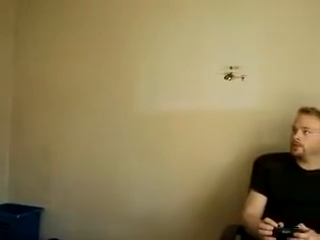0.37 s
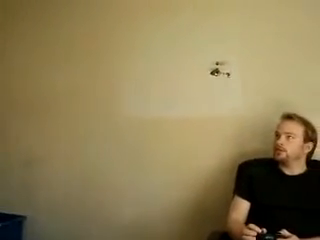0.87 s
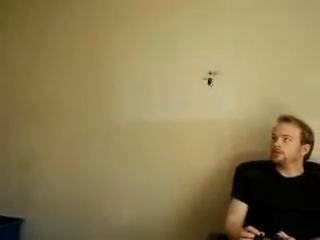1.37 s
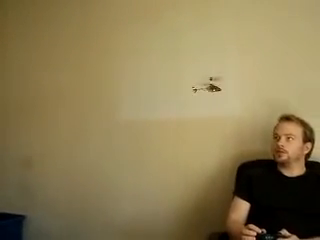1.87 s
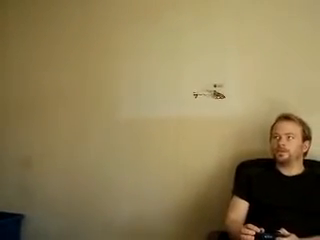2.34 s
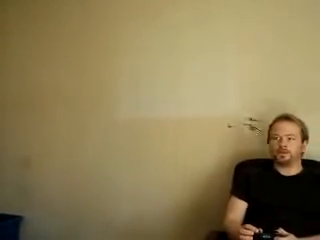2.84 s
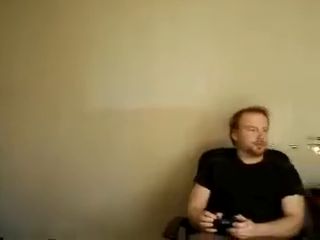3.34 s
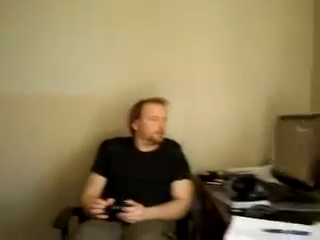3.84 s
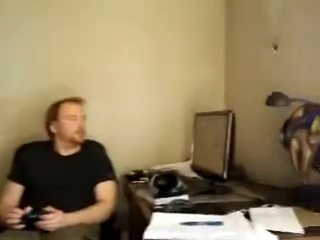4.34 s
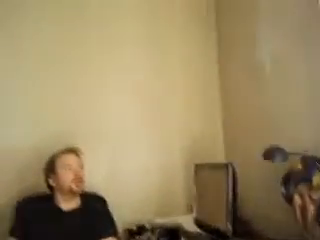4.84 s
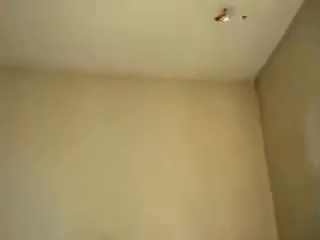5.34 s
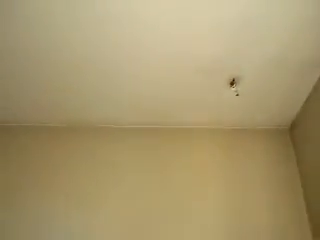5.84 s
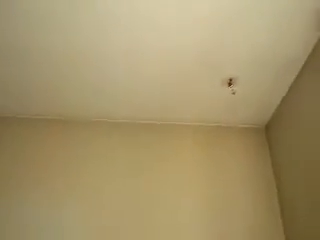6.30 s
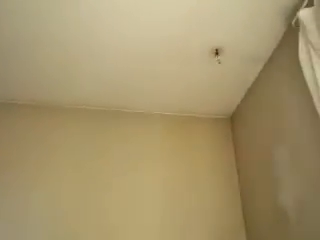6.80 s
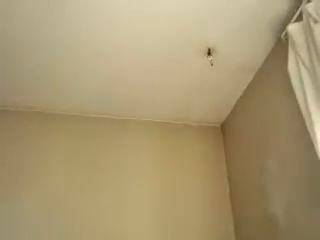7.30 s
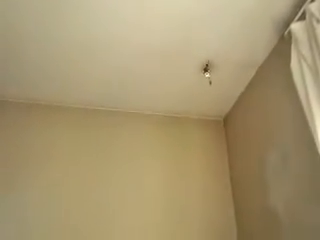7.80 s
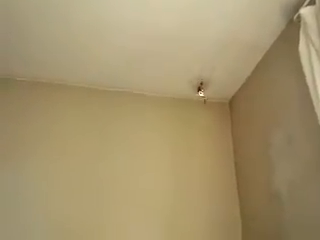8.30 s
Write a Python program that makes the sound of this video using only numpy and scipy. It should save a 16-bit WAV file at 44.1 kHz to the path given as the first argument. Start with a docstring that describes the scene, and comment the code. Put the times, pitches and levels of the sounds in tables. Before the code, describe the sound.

A little electric helicopter with two rotors flies without pause for about 8.4 seconds in a bare, lightly echoing room, picked up in mono by a small camera microphone. A loud, bright wash of gear clatter and blade hiss fills the treble, grainy and fluttering, its very top cut away. Inside it sit two close motor whines, around 3 kHz with higher and lower companions, rough and beating. They waver, dip slightly around 2.5 s, then climb to their highest near 4.3 s. They sink by 5.5 s, spread clearly apart around 5.8 s, draw together and droop to their lowest near 7.5 s, then rise again by 8 s. Short swells of whine come and go, strong near 2.8, 6.7 and 7.6 s. Faint blade hum and a wavering low house hum lie underneath. It ends still flying.

```python
"""A toy helicopter with two stacked rotors flies about a bare room before one small camera microphone.
From the start two motors whine through seven-tooth pinions and their pitches wander, rising until about 4.3 s.
They sink by 5.5 s, draw widely apart near 5.8 s, reach their lowest near 7.5 s and then recover.
Throughout, the crossing blades hum as rotating interference, and gear clatter and blade hiss, as shaped noise,
fill the treble; the house adds a wavering low hum, rumble, faint tones and a quiet noise floor."""
import sys
import numpy as np
from scipy import signal
from scipy.fft import rfft, irfft
from scipy.io import wavfile
from scipy.ndimage import uniform_filter1d, map_coordinates

SR = 44100
rng = np.random.default_rng(int(sys.argv[2]) if len(sys.argv) > 2 else 0)


def amplitude_ratio(level_db):
    """Convert a level in decibels to the matching linear amplitude (field) ratio."""
    exponent = np.asarray(level_db, float) / 20
    return 10 ** exponent


def wrap_up_sound(samples):
    """Save the sound to the file named by the first command line argument, as 16-bit audio."""
    columns = np.atleast_2d(samples).T
    # keep every value between -1 and 1, then stretch to whole-number steps
    tamed = np.clip(columns, -1, 1)
    steps = np.round(tamed * 32767).astype(np.int16)
    wavfile.write(sys.argv[1], SR, steps)


N = 371322
T = np.arange(N) / SR

# throttle moves both motors together, steering moves them apart:
# (time [s], first shaft rate [Hz], second shaft rate [Hz])
SHAFT_SPEEDS = [(0.0, 422.2, 460.6), (0.42, 424.5, 456.3), (0.98, 410, 447), (1.14, 415, 449),
                (1.34, 427.2, 449.6), (1.92, 420.5, 453.1), (2.22, 409.9, 439), (2.6, 407.6, 429.5),
                (3.0, 418.4, 454.8), (3.2, 421.6, 461.6), (3.58, 423.8, 465), (3.78, 432, 487.6),
                (4.0, 437.2, 498), (4.34, 445.1, 499.8), (4.68, 436.4, 490), (4.96, 442.7, 469.2),
                (5.42, 411.3, 436), (5.56, 406.3, 452), (5.78, 410.7, 487.8), (6.1, 422, 474.3),
                (6.72, 417.6, 457.6), (7.1, 393.4, 426.4), (7.48, 388.9, 413.8), (7.98, 417.6, 451.9),
                (8.42, 418.4, 462.5)]
# flight across the room: (time [s], relative level of clatter and hiss [dB],
# relative level of the second shaft's fundamental [dB])
FLIGHT_LEVELS = [(0.0, 0.5, 0.5), (2.0, 0, 3), (2.5, -1.5, -10), (2.9, 1, -11), (3.5, 1.5, -4),
                 (3.9, 1, -1.5), (5.0, 1, -2), (5.6, 1, -14.5), (6.15, 0.5, -3), (6.9, .5, -10.5),
                 (7.35, -1, -1), (7.8, 0.5, -7), (8.42, 1, -6)]
# tooth-mesh whine swelling as the craft drifts through the room's echoes:
# (centre time [s], length [s], peak level [dB])
MESH_SWELLS = [(0.64, .14, -57), (1.0, 0.19, -42), (1.42, .4, -41.5), (2.62, .14, -39), (2.85, 0.14, -36.5),
               (3.1, .2, -43), (3.42, .2, -43), (3.75, .2, -41.5), (4.15, .4, -41), (4.55, 0.36, -42),
               (4.95, .14, -41), (5.4, 0.15, -40), (5.65, .2, -41.5), (5.82, .12, -40.5),
               (6.11, 0.12, -40.5), (6.42, .3, -42.5), (6.69, .18, -36), (7.25, 0.46, -46.5),
               (7.64, 0.3, -36.5), (8.05, 0.15, -43.5)]
# weaker multiples of each shaft before the body colours them: (multiple of shaft rate [1], level [dB])
FIRST_SHAFT_ORDERS = [(5, -57), (6, -62.5), (8, -57.5), (9, -64), (11, -60), (12, -53), (14, -51),
                      (15, -56)]
SECOND_SHAFT_ORDERS = [(5, -60.5), (6, -66), (13, -53.5), (15, -58)]
# multiples of the second shaft that stand out for a while as the craft turns:
# (centre time [s], length [s], multiple of shaft rate [1], peak level [dB])
SECOND_SHAFT_SWELLS = [(0.0, 0.57, 8, -52.5), (2.7, 0.51, 8, -52), (4.15, .6, 8, -45), (5.83, 0.31, 8, -48),
                       (6.35, 0.21, 8, -49), (8.4, .3, 8, -56), (0.45, 2.6, 10, -50), (1.6, .7, 10, -51),
                       (5.05, .4, 10, -56), (5.82, 0.29, 10, -48.5), (6.55, .4, 10, -51.5),
                       (0.1, 0.55, 11, -54.5), (3.3, 0.68, 11, -50.5), (2.45, .4, 11, -52),
                       (6.1, .4, 11, -53), (6.52, 0.37, 11, -50), (8.28, .45, 11, -44),
                       (1.9, 0.36, 14, -57), (3.2, .6, 14, -58), (4.1, 0.56, 14, -50), (4.8, .5, 14, -51),
                       (3.1, .4, 7, -47), (4.2, 1.5, 7, -48.5), (5.95, 0.51, 14, -48), (6.6, 0.63, 14, -47),
                       (7.3, 0.67, 14, -51.5), (8.3, .5, 14, -50.5)]
# rotor gear runout, throb depth scaled by a random walk: (once a rotor turn [1], twice a rotor turn [1])
GEAR_RUNOUT = .3, .18
# swelling tones of the crossing blades:
# (centre time [s], length [s], multiple of crossing rate [1], peak level [dB])
CROSSING_SWELLS = [(1.0, 0.54, 1, -67.5), (3.95, 0.56, 1, -58), (4.85, 0.34, 1, -66.5),
                   (5.5, 0.58, 1, -56.5), (6.4, 1.3, 1, -62.5), (7.78, 0.31, 1, -58.5),
                   (8.15, .5, 1, -65.5), (0.9, 3.7, 2, -69.5), (2.9, 1.3, 2, -70), (4.0, 0.45, 2, -70.5),
                   (6.1, 0.75, 2, -69.5), (7.35, 0.87, 2, -69), (8.3, .5, 2, -67.5), (2.4, 1.6, 3, -74),
                   (4.2, 1.3, 3, -71.5), (5.65, 0.67, 3, -68.5), (7.9, 0.81, 3, -70)]
# plastic body and microphone resonance: (frequency [Hz], relative level [dB per Hz])
BODY_SPECTRUM = [(1500, -24.5), (2000, -20), (2250, -14.5), (2450, -0.5), (2900, 3), (3250, -3),
                 (3800, -5.5), (4500, -1), (5300, -6.5), (5900, -4), (6300, -5), (7900, -6)]
# swells of the low house hum, then of the rumble: (centre time [s], length [s], peak level [dB])
HUM_SWELLS = [(0.22, 0.079, -61), (1.04, 0.11, -60), (1.25, 0.16, -62), (1.56, 0.24, -57),
              (1.88, 0.24, -55), (2.5, .25, -56), (2.9, .45, -57), (3.8, .35, -56.5), (4.25, .14, -58),
              (4.52, .14, -57), (4.77, .14, -55), (5.09, .14, -56.5), (5.37, 0.1, -57.5),
              (5.98, 0.29, -55.5), (6.8, .25, -58), (7.32, 0.49, -55), (7.85, 0.31, -59), (8.35, .3, -59)]
RUMBLE_SWELLS = [(0.64, 0.41, -70), (3.7, 0.68, -62), (6.6, 0.27, -67), (8.3, 0.69, -68)]
# faint house tones: (frequency [Hz], level [dB])
HOUSE_TONES = [(75, -80), (95, -77.5), (222, -71.5), (392, -79)]
# spectrum of the quiet floor: (frequency [Hz], relative level [dB per Hz])
FLOOR_SPECTRUM = [(15, -33), (25, -1), (64, -1.5), (171, -12.5), (230, -4.5), (292, -7.5), (479, -11),
                  (1090, -14.5), (2000, -6), (2600, -45), (4400, -120)]
# steep top cut of the camera: (frequency [Hz], gain [dB])
CAMERA_RESPONSE = [(7960, -0.5), (8020, -10.5), (8200, -78)]

PINION_TEETH, BLADES = 7, 2  # teeth of each pinion, blades of each rotor
MESH_REST_DB, STRONG_REST_DB, CROSSING_REST_DB = -47.5, -62, -81  # levels between swells
HUM_REST_DB, RUMBLE_REST_DB = -70, -69.5  # levels between swells
SHAFT_DB, BAND_DB, TREBLE_DB = -66.5, -40.5, -34  # reference levels, moved by the flight
TREBLE_SLOPE = 1.03  # treble change per dB of clatter and hiss change
SPLIT_HZ = 4190  # between the two noise bands
HUM_HZ, FLOOR_DB = 51.6, -61.5  # mean hum frequency, reference level of the floor
ROOM_T60_S, ROOM_DB = 0.41, -7  # decay time, echoes against the direct sound


def helicopter():
    """Superposition: whines of motors and crossing blades add to gear clatter and blade hiss."""
    first_hz, second_hz = curves(SHAFT_SPEEDS)
    noise_db, shaft_db = curves(FLIGHT_LEVELS)
    first = running_turns(first_hz, 0.001183)
    second = running_turns(second_hz, 0.0012)
    echoed = room(pinion_mesh(first) + first_motor(first) + second_motor(second))
    fundamental = tone(second, SHAFT_DB + shaft_db, 3.2, rate=3.7)
    whine = echoed + fundamental + crossing_blades(first, second)
    return whine + clatter_and_hiss(first, second, noise_db)


def pinion_mesh(turns):
    """Gear meshing: each tooth contact excites the gear, a tone at teeth times shaft rate."""
    return tone(PINION_TEETH * turns, swells(MESH_SWELLS, MESH_REST_DB), 1.2, rate=14, flicker_db=3.0)


def first_motor(turns):
    """Harmonic series of the first shaft, amplitude-modulated by gear runout."""
    return shaft_orders(turns, FIRST_SHAFT_ORDERS, 7.7) * throb(turns)


def second_motor(turns):
    """Harmonic series of the second shaft with swelling strong multiples, modulated by gear runout."""
    gear = shaft_orders(turns, SECOND_SHAFT_ORDERS, 8.5)
    for multiple in (7, 8, 10, 11, 14):
        level_db = swells(chosen(SECOND_SHAFT_SWELLS, multiple), STRONG_REST_DB)
        gear += tone(multiple * turns, level_db, 2.9, rate=12, flicker_db=3.0)
    return gear * throb(turns)


def shaft_orders(turns, orders, fade_db):
    """Resonant filtering: weak shaft multiples, each fading on its own, coloured by the body."""
    tones = sum(tone(int(k) * turns, db, fade_db, rate=6, flicker_db=5.0) for k, db in orders)
    return colour(tones, BODY_SPECTRUM)


def throb(turns):
    """Amplitude modulation: a rotor gear out of true puts side lines round the shaft multiples."""
    angle = 2 * np.pi * turns / PINION_TEETH
    once = GEAR_RUNOUT[0] * np.sin(angle) * walk(6)
    twice = GEAR_RUNOUT[1] * np.sin(2 * angle) * walk(6)
    return unit(1 + once + twice)


def crossing_blades(first, second):
    """Rotor interaction: with opposed rotation, blades cross at the sum of both blade rates."""
    crossing = BLADES * (first + second) / PINION_TEETH
    hum = 0
    for multiple in (1, 2, 3, 4):
        level_db = swells(chosen(CROSSING_SWELLS, multiple), CROSSING_REST_DB)
        hum = hum + tone(multiple * crossing, level_db, 1.5, rate=6.6)
    return hum


def clatter_and_hiss(first, second, noise_db):
    """Broadband radiation: tooth noise and blade hiss, shaped by the body, with patchy narrow bands."""
    # the first pinion runs slightly off centre, so its clatter throbs once a shaft turn
    first_gear = clatter(first, 0.73) * (1 + 0.4 * np.sin(2 * np.pi * first))
    second_gear = amplitude_ratio(-0.5) * clatter(second, 0.81)
    hiss = amplitude_ratio(-2) * rng.standard_normal(N)
    rush = colour(first_gear + second_gear + hiss, BODY_SPECTRUM)
    rush = patchy_bands(rush, depth_db=2.66, width_hz=90., hold_s=0.1)
    body = signal.sosfiltfilt(signal.butter(4, SPLIT_HZ, fs=SR, output="sos"), rush)
    treble = rush - body
    body_db = BAND_DB + noise_db + 0.34 * walk(10)
    treble_db = TREBLE_DB + TREBLE_SLOPE * noise_db + 0.083 * walk(8.5)
    return amplitude_ratio(body_db) * unit(body) + amplitude_ratio(treble_db) * unit(treble)


def clatter(turns, memory, size=800):
    """Cyclic correlation: tooth noise nearly repeats at each turn of the rotor gear."""
    rotor = turns / PINION_TEETH
    fresh = rng.standard_normal((int(rotor[-1]) + 2, size))  # one row a rotor turn
    # each row keeps a share of the row before
    pattern = signal.lfilter([1], [1, -np.clip(memory, 0, .98)], fresh, axis=0).ravel()
    return unit(map_coordinates(pattern, [rotor * size], order=3))


def patchy_bands(x, depth_db, width_hz, hold_s, size=1024):
    """Random spectral modulation: narrow bands of the noise swell and fade at random, making it patchy."""
    z = signal.stft(x, nperseg=size)[2]
    field = rng.standard_normal(z.shape)
    for axis, cells in enumerate((width_hz * size / SR, hold_s * 2 * SR / size)):
        field = uniform_filter1d(field, max(int(cells), 1), axis=axis)
    return signal.istft(z * amplitude_ratio(depth_db * unit(field)), nperseg=size)[1][:N]


def room(x):
    """Reverberation: bare walls return a dense decaying tail that beats with the direct sound."""
    t = T[:SR // 2]
    tail = rng.standard_normal(len(t)) * amplitude_ratio(-60 * t / ROOM_T60_S)
    tail = tail / np.sqrt(np.sum(tail ** 2))
    return x + amplitude_ratio(ROOM_DB) * signal.fftconvolve(x, tail)[:N]


def house():
    """Superposition of the background: wavering hum, rumble, faint tones and floor."""
    return house_hum() + house_rumble() + house_tones() + quiet_floor()


def house_hum():
    """Frequency modulation: a low sine wavers in pitch while its level swells and sinks."""
    return tone(running_turns(HUM_HZ, 0.015), swells(HUM_SWELLS, HUM_REST_DB))


def house_rumble():
    """Band-limited noise: a faint rumble with a swelling, wandering level."""
    band = signal.butter(2, (65., 200.), "band", fs=SR, output="sos")
    rumble = signal.sosfilt(band, rng.standard_normal(N))
    return amplitude_ratio(swells(RUMBLE_SWELLS, RUMBLE_REST_DB) + 0.83 * walk(4)) * unit(rumble)


def house_tones():
    """Pure tones: faint sines of fixed pitch fade slowly."""
    return sum(tone(hz * T, db, 3.0, rate=3) for hz, db in HOUSE_TONES)


def quiet_floor():
    """Stationary coloured noise, its level wandering slightly."""
    return amplitude_ratio(FLOOR_DB + 0.5 * walk(1.5)) * unit(colour(rng.standard_normal(N), FLOOR_SPECTRUM))


def tone(turns, db, fade_db=0, rate=5, flicker_db=0):
    """Phase-driven sine about a nominal rms level, with random slow fading and fast flicker."""
    # limited upward, as echoes cancel deeply but reinforce little
    fade = fade_db * np.minimum(walk(rate), 0.5)
    flicker = flicker_db * np.minimum(walk(35), 1)
    return np.sqrt(2) * amplitude_ratio(db + fade + flicker) * np.sin(2 * np.pi * (turns + rng.random()))


def running_turns(hz, wobble):
    """Phase is the integral of frequency: a count of turns at a slightly trembling rate."""
    return np.cumsum(hz * (1 + wobble * walk(30))) / SR


def swells(rows, rest_db):
    """Power addition: bell-shaped rises add to a resting level, giving dB."""
    power = amplitude_ratio(2 * rest_db) + np.zeros(N)
    for s, length, db in rows:
        # length is the full width at half amplitude
        power = power + amplitude_ratio(2 * db) * np.exp(-np.log(16) * 2 * ((T - s) / length) ** 2)
    return 10 * np.log10(power)


def chosen(rows, k):
    """Harmonic selection: the swell rows of one multiple."""
    return [(s, length, db) for s, length, multiple, db in rows if round(multiple) == k]


def curves(rows):
    """Linear interpolation: table columns, one value per sample."""
    s, *columns = np.transpose(rows)
    return [np.interp(T, s, c) for c in columns]


def walk(rate):
    """Smoothed random process: levels drawn at a rate in Hz and slewed twice, of rms 1."""
    k = int(SR / rate)
    held = np.repeat(rng.standard_normal(N // k + 1), k)
    return unit(uniform_filter1d(uniform_filter1d(held, k), k)[:N])


def colour(x, points):
    """Linear filtering by a spectrum in (Hz, dB), interpolated over log frequency."""
    hz, db = np.transpose(points)
    f = np.maximum(np.fft.rfftfreq(N, 1 / SR), 1)
    return irfft(rfft(x) * amplitude_ratio(np.interp(np.log(f), np.log(hz), db)), N)


def unit(x):
    """Normalisation to rms 1."""
    return x / np.sqrt(np.mean(x ** 2))


def scene():
    """Monophonic pickup: one microphone feeds both channels."""
    return np.tile(helicopter() + house(), (2, 1))


def roll_off(x):
    """The treble ends steeply here."""
    return signal.sosfilt(signal.butter(12, 9300, fs=SR, output="sos"), x)


def record(dry):
    """Band limitation: the camera samples slowly, so the top is cut steeply."""
    mix = np.array([colour(side, CAMERA_RESPONSE) for side in dry])
    return roll_off(mix)


dry = scene()
out = record(dry)
wrap_up_sound(out)
```